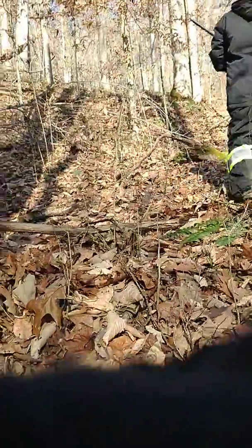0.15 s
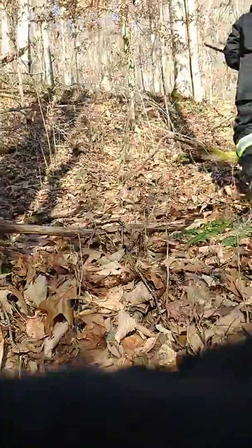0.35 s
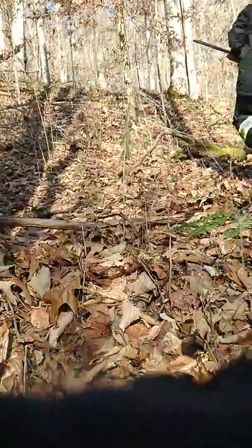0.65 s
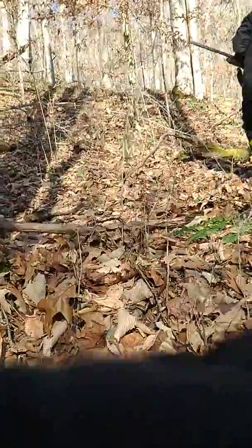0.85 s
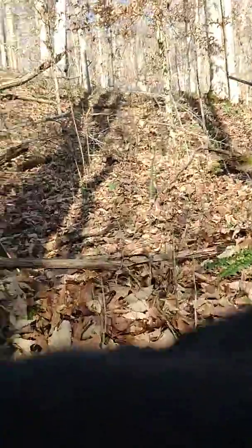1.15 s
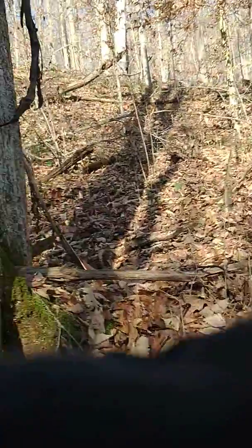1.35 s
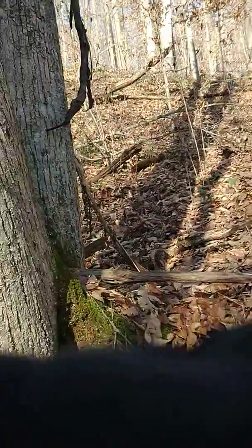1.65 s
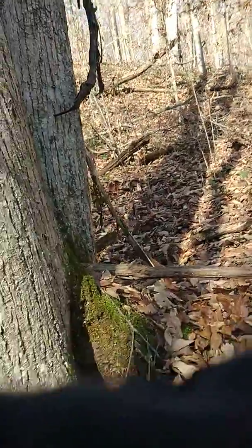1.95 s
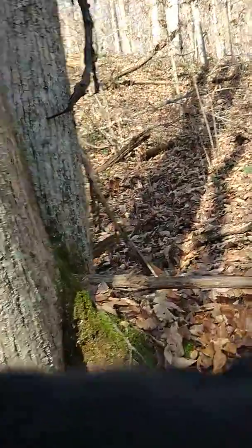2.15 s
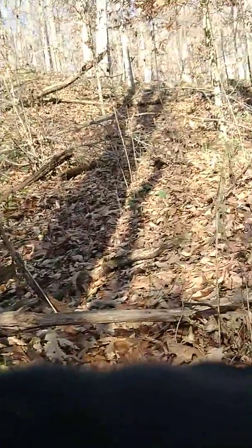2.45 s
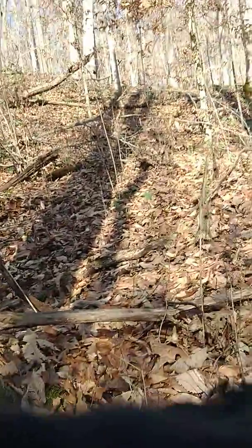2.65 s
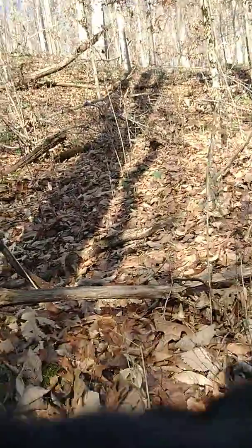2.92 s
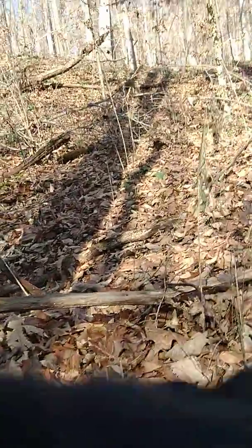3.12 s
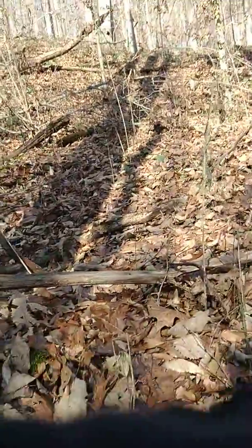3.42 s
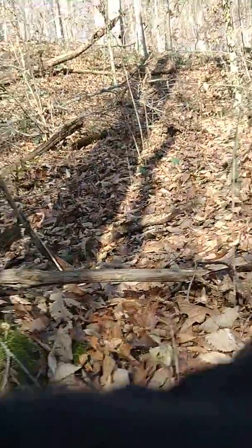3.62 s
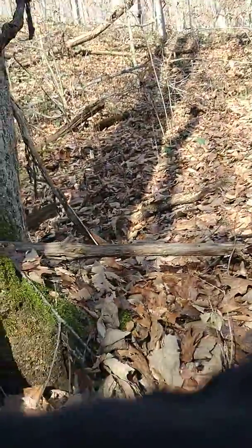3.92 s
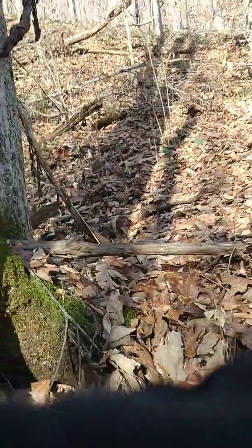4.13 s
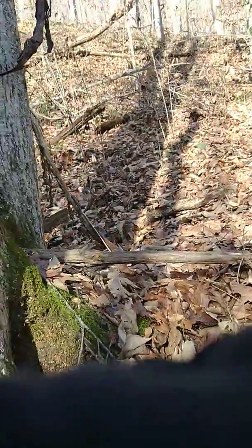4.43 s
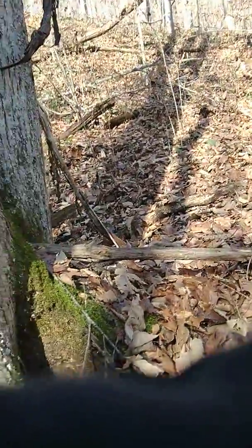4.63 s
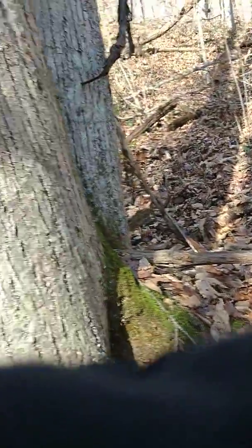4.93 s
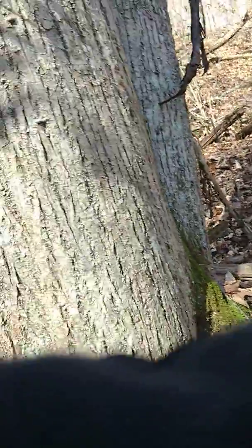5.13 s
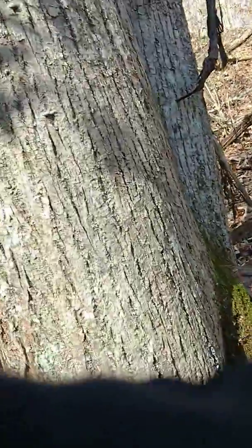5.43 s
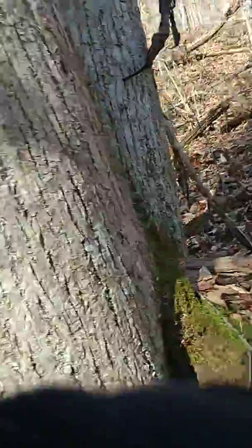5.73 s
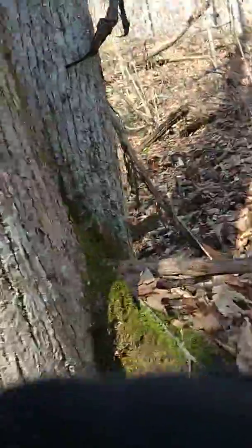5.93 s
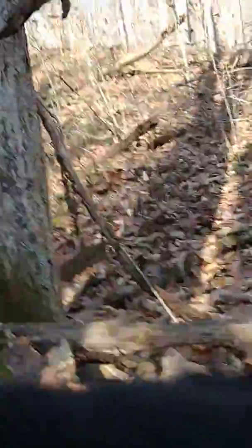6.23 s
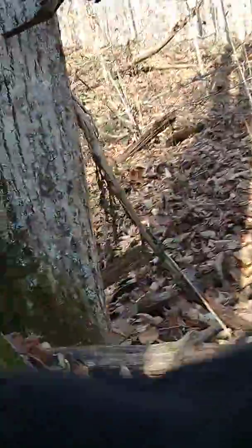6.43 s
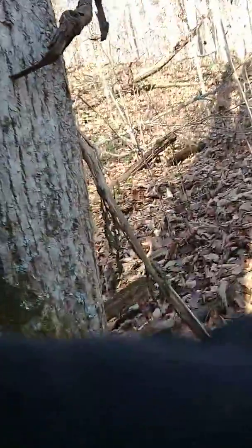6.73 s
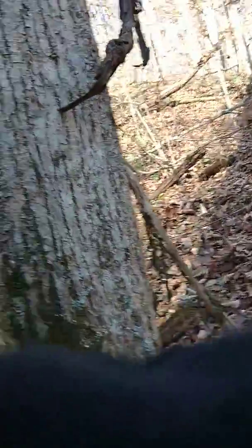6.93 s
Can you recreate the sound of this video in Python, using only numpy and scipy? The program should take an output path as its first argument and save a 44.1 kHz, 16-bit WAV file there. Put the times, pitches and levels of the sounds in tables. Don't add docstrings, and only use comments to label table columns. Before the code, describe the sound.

Boots crunch unevenly through dry fallen leaves in open woodland, with crisp twig snaps, brittle ticks, dull taps and soft low wind thumps on the microphone.

```python
import sys
import numpy as np
from scipy import signal
from scipy.fft import rfft, irfft, next_fast_len
from scipy.io import wavfile
from scipy.ndimage import uniform_filter1d, map_coordinates

SR = 44100
rng = np.random.default_rng(int(sys.argv[2]) if len(sys.argv) > 2 else 0)


def to_wav(s):
    ch = np.atleast_2d(s).T
    pcm = np.round(np.clip(ch, -1, 1) * 32767)
    wavfile.write(sys.argv[1], SR, pcm.astype(np.int16))


def boost(x):
    u = np.asarray(x, float) / 20
    return 10 ** u


N = 311787

# start in seconds, hold in seconds, crackle level in dB,
# rise in seconds, fall in seconds.
STEPS = [(0.476, 0.081, -43.8, 0.038, 0.119), (1.327, 0.001, -45.4, 0.088, 0.117),
         (1.784, 0.016, -40.0, 0.026, 0.054), (2.529, 0.044, -37.4, 0.015, 0.012),
         (3.494, 0.011, -45.2, 0.039, 0.098), (3.892, 0.028, -44.8, 0.07, 0.101),
         (4.265, 0.084, -44.4, 0.068, 0.093), (4.509, 0.108, -41.1, 0.017, 0.048),
         (5.25, 0.071, -40.3, 0.036, 0.039), (5.557, 0.067, -47.4, 0.03, 0.033),
         (6.187, 0.02, -47.1, 0.033, 0.236), (6.34, 0.042, -40.9, 0.012, 0.015),
         (6.453, 0.0, -38.7, 0.028, 0.083), (6.68, 0.022, -44.5, 0.051, 0.182),
         (6.834, 0.089, -40.9, 0.049, 0.032)]
# start in seconds, hold in seconds, crackle level in dB,
# rise in seconds, fall in seconds.
SHUFFLES = [(0.004, 0.04, -55.2, 0.05, 0.05), (0.143, 0.219, -51.5, 0.113, 0.115),
            (0.806, 0.0, -51.3, 0.021, 0.104), (1.093, 0.145, -52.0, 0.057, 0.132),
            (1.592, 0.112, -50.1, 0.054, 0.067), (1.741, 0.021, -46.9, 0.024, 0.052),
            (1.952, 0.505, -51.8, 0.029, 0.069), (2.599, 0.01, -53.1, 0.012, 0.038),
            (2.906, 0.018, -52.8, 0.143, 0.048), (2.997, 0.037, -53.0, 0.012, 0.076),
            (3.193, 0.056, -56.3, 0.018, 0.012), (3.275, 0.053, -54.0, 0.036, 0.179),
            (3.574, 0.113, -58.2, 0.066, 0.076), (3.988, 0.166, -56.9, 0.072, 0.012),
            (4.831, 0.051, -57.2, 0.091, 0.045), (5.141, 0.02, -54.8, 0.133, 0.083),
            (5.463, 0.065, -56.0, 0.052, 0.11), (5.756, 0.008, -55.1, 0.012, 0.015),
            (5.829, 0.154, -59.5, 0.237, 0.016), (6.0, 0.14, -51.6, 0.019, 0.08),
            (6.543, 0.154, -62.7, 0.045, 0.092), (7.005, 0.012, -50.6, 0.023, 0.081)]
# time in seconds, body level in dB re crackle.
SINK = [(0, 0), (.4, -4), (.8, -0.5), (1.3, -4), (1.6, 1.5), (2.0, -4.5), (2.53, 0), (2.62, -8),
        (3.5, -3.5), (4.5, -5), (5.5, -2.5), (6.3, -1.5), (6.9, -6.5), (7.07, -1)]
# time in seconds, strength in dB.
AIR = [(0, -56.5), (.55, -55.5), (.72, -59), (1.14, -53.5), (1.65, -50.5), (1.95, -54.5), (2.3, -50.5),
       (2.53, -48.5), (2.6, -65.5), (3.3, -64.5), (3.7, -56.5), (4.2, -53.5), (4.5, -53), (4.68, -61.5),
       (5.7, -64), (6.3, -51.5), (6.5, -58.5), (7.07, -63)]
# start in seconds, peak in dB, pitch in Hz.
THUMPS = [(0.799, -43, 146), (0.932, -53, 124), (1.318, -58, 118), (1.382, -50, 135), (1.568, -42.5, 150),
          (2.012, -33, 95), (2.039, -40, 74), (2.124, -49, 99.6), (2.191, -51, 124), (2.896, -46, 91),
          (3.293, -42.5, 121), (3.755, -43, 78.1), (3.85, -37, 76), (3.869, -50, 64.6), (3.984, -40.5, 76),
          (4.024, -38.5, 88.8), (4.133, -45, 108), (4.175, -35, 129), (4.208, -36.5, 83.4),
          (4.349, -49, 124), (5.135, -45, 104), (5.178, -43.5, 80), (5.789, -54, 128), (6.079, -50, 93),
          (6.234, -37, 119), (6.284, -32.5, 115), (6.305, -29.5, 105), (6.364, -46, 116),
          (6.499, -49, 94.2), (6.675, -51.5, 155)]
# start in seconds, peak in dB, low part in dB re peak.
SNAPS = [(0.1384, -35, -14), (0.459, -44, -15), (0.806, -44, 9), (0.9666, -39, -27), (1.503, -34, -5),
         (1.584, -52, 18), (1.7887, -25.5, -10), (1.949, -37, -24), (2.5083, -46, -10), (2.9047, -39, -28),
         (2.938, -44.5, -25), (2.994, -40, -15), (3.024, -39, -16), (3.199, -39, -21), (3.2266, -43, -22),
         (3.3202, -38, -22), (3.4501, -47, -31), (3.498, -31, -17), (3.817, -42, -12), (4.187, -44, -7),
         (4.503, -43, -20), (5.0923, -35, -23), (5.5238, -32, -25), (5.5547, -35, -22), (5.753, -40, -11),
         (5.999, -45, -11), (6.2765, -33, -11), (6.336, -24.5, -9), (6.4268, -43, -13), (6.633, -32.5, -2)]
# start in seconds, peak in dB.
TICKS = [(0.142, -26), (0.1705, -52), (0.4586, -35), (0.7482, -48), (0.8754, -53), (0.968, -50),
         (1.0216, -50), (1.585, -43), (1.948, -32), (2.5217, -29), (2.801, -49), (3.0694, -32),
         (3.487, -36), (5.7937, -49), (5.997, -37), (6.367, -28), (6.3799, -15), (6.4552, -27),
         (6.5464, -42), (6.767, -37), (6.8744, -36), (6.8904, -21), (6.8954, -34), (6.9014, -28),
         (6.9133, -28)]
# start in seconds, peak in dB.
TAPS = [(0.845, -37), (1.266, -37.5), (1.614, -44), (1.677, -42), (1.683, -32), (1.734, -36),
        (1.773, -31.5), (1.783, -35), (1.789, -30), (1.798, -35), (1.808, -37), (2.277, -36), (2.524, -36),
        (2.535, -29), (5.76, -36.5), (6.622, -35), (6.708, -40), (6.789, -37), (6.942, -48)]

# frequency in Hz, density in dB per Hz.
CRACKLE_SPECTRUM = [(900, -29), (2300, -2.5), (3500, -6), (5000, -7.5), (7000, -3.5), (10000, -0.5),
                    (13000, -2.5), (15500, -1.5)]
# frequency in Hz, density in dB per Hz.
BODY_SPECTRUM = [(150, -10), (350, 0.5), (700, 0), (1200, -2), (1800, -10), (2600, -25.5), (4000, -17.5)]
# frequency in Hz, density in dB per Hz.
BUFFET_SPECTRUM = [(20, -52), (40, -25), (60, -3.5), (95, -4.5), (125, -1.5), (160, -7.5), (210, -9),
                   (300, -38), (500, -74)]
# frequency in Hz, density in dB per Hz.
ROAR_SPECTRUM = [(100, -14), (160, -7.5), (200, 1.5), (245, -1.5), (290, -1.5), (380, -11.5), (600, -19),
                 (1000, -71)]

# frequency in Hz, level difference in dB.
PORT_BALANCE = [(300, 0), (700, 0), (1500, -2), (6000, -2), (8500, -2), (10500, 2.5), (12000, 1),
                (13500, -2), (15500, -3)]
# frequency in Hz, share of power from 0 to 1.
ALIKE = [(200, .6), (550, .65), (900, .2), (2000, .05), (16000, .03)]
# frequency in Hz, gain from 0 to 1.
CROSS = [(100, .6), (500, .6), (1200, .4), (2300, .75), (6000, .68), (8000, .46), (15000, .42)]
# frequency in Hz, level difference in dB.
TRIM = [(200, 2.2), (500, 1), (1200, -2), (2000, 0.5), (3000, -5), (5000, 1.7), (10000, 9), (13000, 1),
        (15000, 0)]

ARRIVE_S, STEER_S = 21 / SR, 18.4 / SR
CUT_HZ, TOP_HZ = 26, 15550
FAR_DB = -70.5
BRIGHTER, USUAL_DB = 0.15, -59.5
STEP_ROAR_DB = -19
BUFFET_DB = -3.5
SURGE_DB, SURGE_RISE_S, SURGE_FALL_S = -10.5, 0.017, 0.04
SNAP_T60_S = 0.014
TAP_HZ = 470


def unit(x):
    return x / np.sqrt(np.mean(x ** 2) + 1e-20)


def along(points, hz):
    f, v = np.transpose(points)
    return np.interp(np.log(hz + 1), np.log(f + 1), v)


def curve(rows):
    s, value = np.transpose(rows)
    return np.interp(np.arange(N) / SR, s, value)


def wobble(rate):
    knots = rng.standard_normal(int(N * rate / SR) + 4)
    return map_coordinates(knots, [np.arange(N) * rate / SR])


def filtered(x, response):
    m = next_fast_len(N + 8192)
    return irfft(rfft(x, m) * response(np.fft.rfftfreq(m, 1 / SR)), m)[..., :N]


def right_first(hz, lag_s):
    return np.exp(-2j * np.pi * np.outer([lag_s, 0], hz))


def add_at(track, s, sound):
    track[round(s * SR):][:len(sound)] += sound


def ports(envelope, spectrum):
    left, right, wave = envelope * rng.standard_normal((3, N))

    def tilt(hz):
        return boost(along(spectrum, hz) + np.outer([.5, -.5], along(PORT_BALANCE, hz)))

    def scattered(hz):
        return tilt(hz) * np.sqrt(1 - along(ALIKE, hz))

    def common(hz):
        return tilt(hz) * np.sqrt(along(ALIKE, hz)) * right_first(hz, ARRIVE_S)

    both = filtered(np.array([left, right]), scattered) + filtered(wave, common)
    hz = np.linspace(1, SR / 2, 4000)
    return both / np.sqrt(np.mean(boost(2 * along(spectrum, hz))))


def swells(rows):
    t = np.arange(0, N, 32) / SR
    s, hold, db, rise, fall = np.transpose(rows)[:, :, None]
    before = (s - t) / rise
    after = (t - s - hold) / fall
    outside = np.maximum(np.maximum(before, after), 0)
    power = boost(2 * db - 20 * outside).sum(axis=0)
    return np.interp(np.arange(N) / SR, t, power)


def grains(rate, spread_db, life_s, bed):
    chance, size = rng.random(N), rng.exponential(size=N)
    breaks = (chance < rate / SR) * boost(2 * spread_db * np.minimum(size, 3.7))
    t = np.arange(600) / SR
    power = signal.fftconvolve(breaks, np.exp(-t / life_s))[:N]
    return unit(np.sqrt(np.abs(power) / np.mean(power) + bed))


def patchy(x, depth_db):
    z = signal.stft(x, nperseg=256)[2]
    field = rng.standard_normal(z.shape[1:])
    field = uniform_filter1d(field, size=7, axis=0)
    field = uniform_filter1d(field, size=12, axis=1)
    gain = boost(depth_db * unit(field) - 0.27 * depth_db ** 2)
    return signal.istft(z * gain, nperseg=256)[1][:, :N]


def leaves():
    crackle_db = 10 * np.log10(swells(STEPS + SHUFFLES) + boost(2 * FAR_DB))
    body_db = curve(SINK) - BRIGHTER * (crackle_db - USUAL_DB)
    clump = wobble(45)
    crackle = ports(grains(rate=500, spread_db=4.0, life_s=0.00035, bed=2.5), CRACKLE_SPECTRUM)
    body = ports(grains(rate=250, spread_db=3, life_s=0.0019, bed=1.34), BODY_SPECTRUM)
    bright = boost(crackle_db + 3.5 + 1.45 * clump) * crackle
    dull = boost(crackle_db + body_db + 2.5 + 0.79 * clump) * body
    return patchy(bright + dull, depth_db=1.82)


def roar():
    power = boost(2 * curve(AIR)) + boost(2 * STEP_ROAR_DB) * swells(STEPS)
    roar_db = 10 * np.log10(power)
    return boost(roar_db + 6.5 + 1.93 * wobble(20)) * ports(np.ones(N), ROAR_SPECTRUM)


def buffet():
    surges = swells([(s, .02, db + SURGE_DB, SURGE_RISE_S, SURGE_FALL_S) for s, db, hz in THUMPS])
    buffet_db = 10 * np.log10(surges + boost(2 * (curve(AIR) + BUFFET_DB)))
    air = filtered(rng.standard_normal((2, N)), lambda hz: boost(along(BUFFET_SPECTRUM, hz)))
    lumpy = unit(boost(2.25 * wobble(28)) * air * boost([[0], [-14]]))
    knocks, t = np.zeros(N + SR), np.arange(SR // 8) / SR
    for s, db, hz in THUMPS:
        push = t / 0.0091 * np.exp(1 - t / 0.0092)
        add_at(knocks, s, boost(db + 8) * push * np.sin(2 * np.pi * hz * t))
    return boost(buffet_db + 7) * lumpy + knocks[:N] * boost([[0], [-25]])


def snaps():
    bright, dull, t = np.zeros(N + SR), np.zeros(N + SR), np.arange(SR // 8) / SR
    burst = 1.8 * boost(-60 * t / SNAP_T60_S)
    scatter = boost(-16 - 60 * t / 0.03)
    for s, db, low_db in SNAPS:
        add_at(bright, s, boost(db - 7.0) * (burst + scatter))
        add_at(dull, s, boost(db + low_db - 13.5) * boost(-60 * t / 0.028))
    for s, db in TICKS:
        add_at(bright, s, boost(db - 9.0 - 60 * t / 0.0032))
    return ports(bright[:N], CRACKLE_SPECTRUM) + ports(dull[:N], BODY_SPECTRUM)


def taps():
    x, t = np.zeros(N + SR), np.arange(SR // 30) / SR
    turns = TAP_HZ * (0.535 * t + .0016 * (1 - np.exp(-t / 0.0019)))
    push = t / 0.0024 * np.exp(1 - t / 0.0017)
    for s, db in TAPS:
        add_at(x, s, boost(db + 2.1) * push * np.sin(2 * np.pi * turns))
    return filtered(x[:N], lambda hz: right_first(hz, 8 / SR))


def scene():
    return leaves() + roar() + buffet() + snaps() + taps()


def top_cut(x):
    return signal.sosfilt(signal.butter(12, 16640, fs=SR, output="sos"), x)


def record(dry):
    across = filtered(dry[::-1], lambda hz: along(CROSS, hz) * np.exp(-2j * np.pi * hz * STEER_S))

    def microphone(hz):
        trim = boost(np.outer([.5, -.5], along(TRIM, hz)))
        low_cut = (1j * hz / (CUT_HZ + 1j * hz)) ** 2
        return trim * low_cut * (hz < TOP_HZ)

    return top_cut(filtered(dry - across, microphone))


dry = scene()
out = record(dry)
to_wav(out)
```